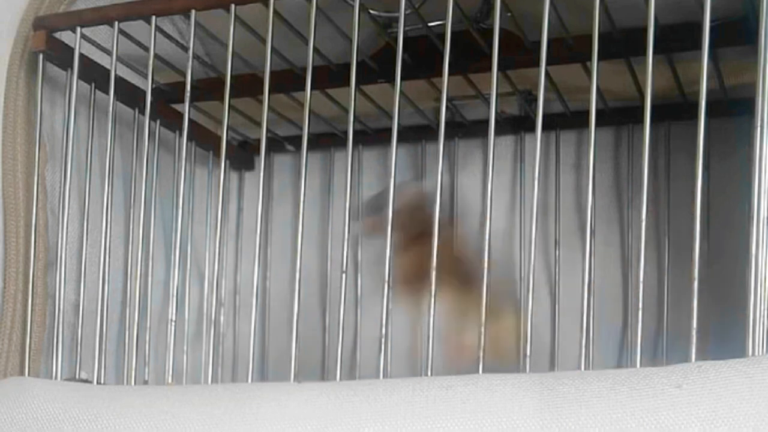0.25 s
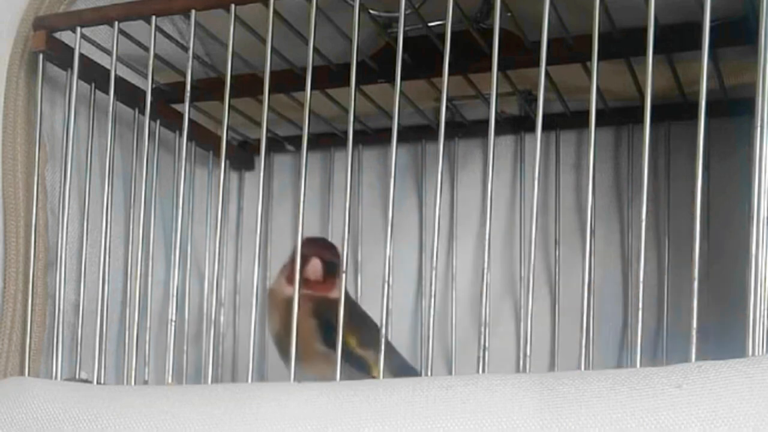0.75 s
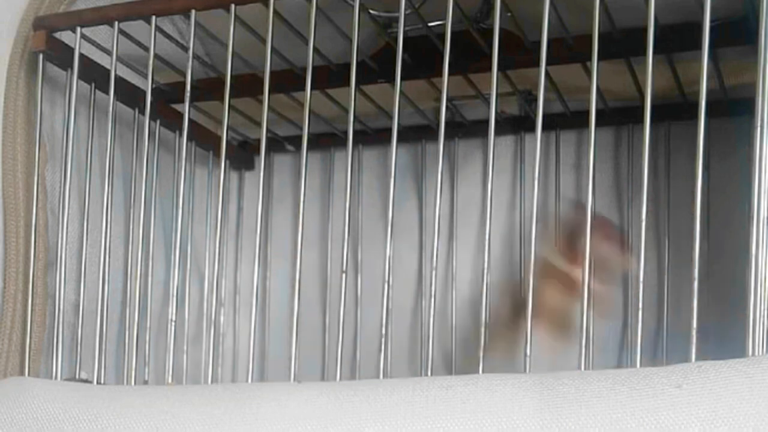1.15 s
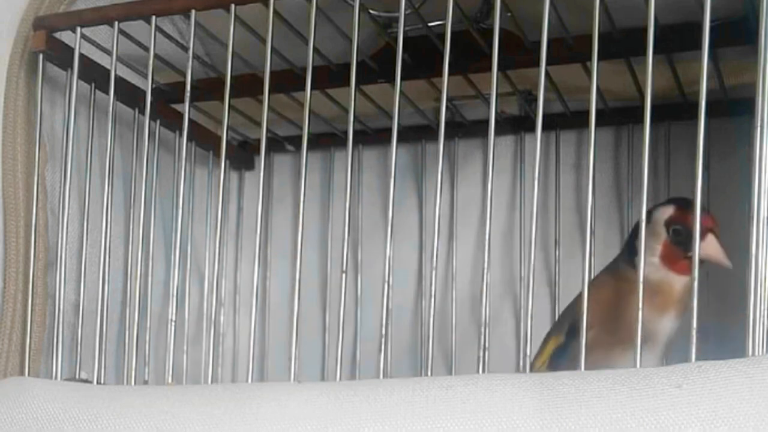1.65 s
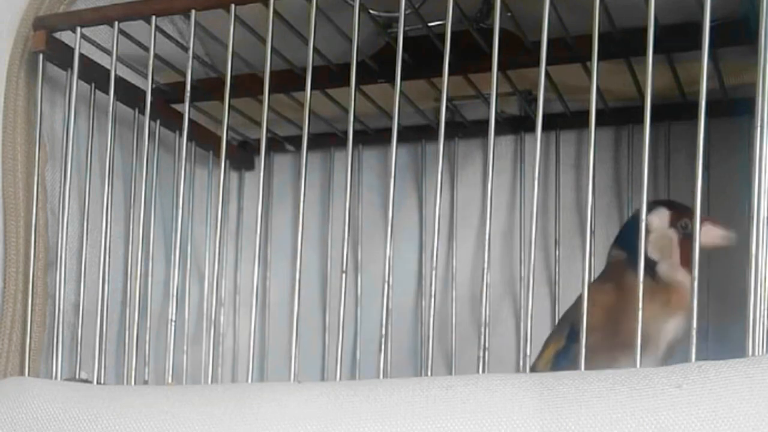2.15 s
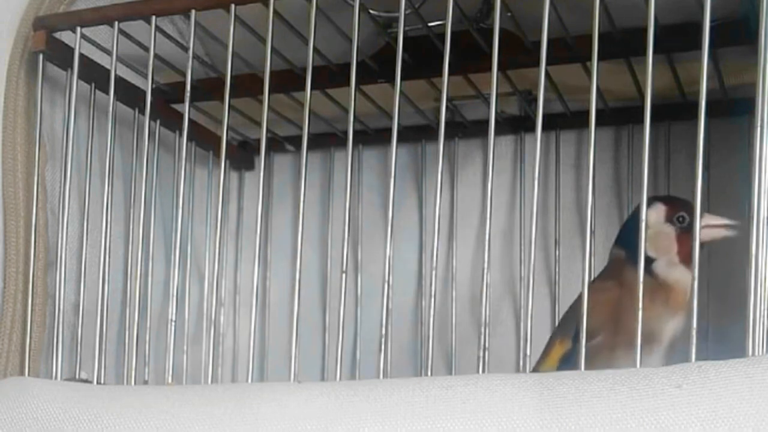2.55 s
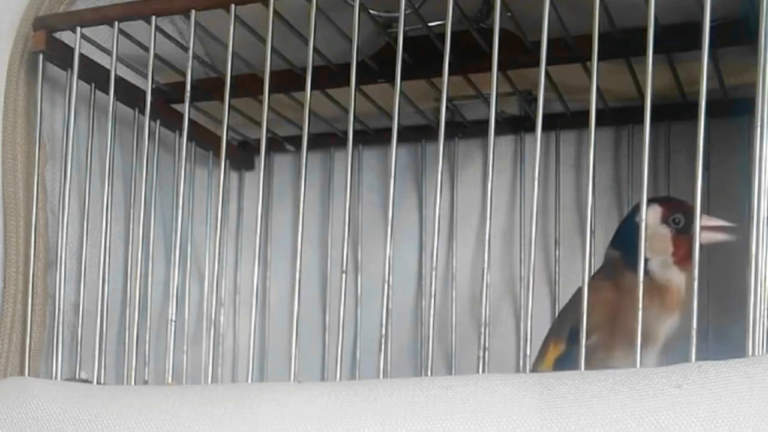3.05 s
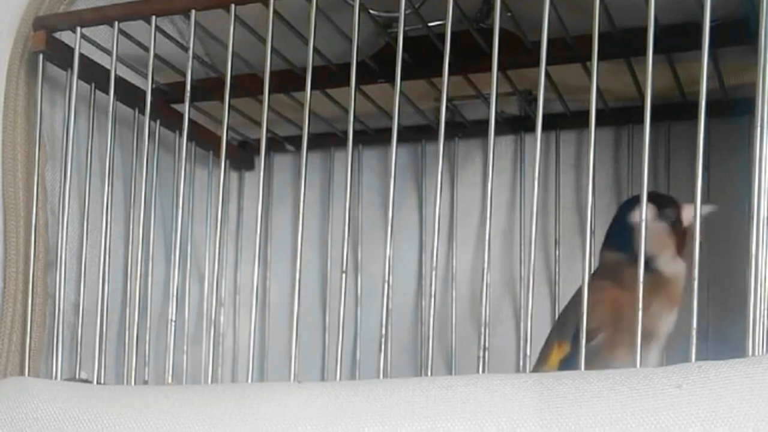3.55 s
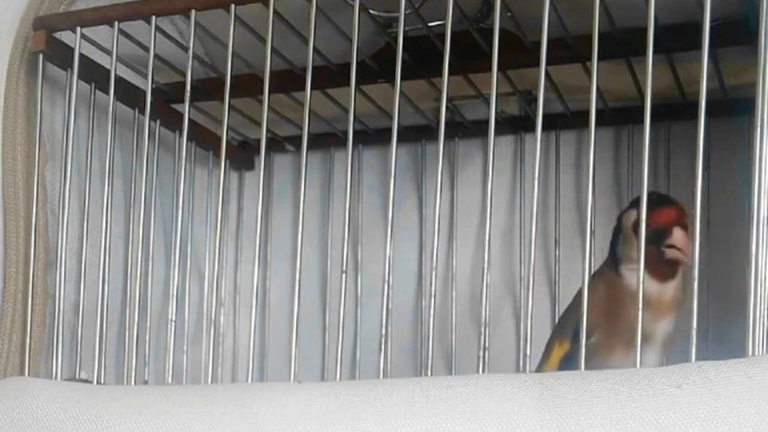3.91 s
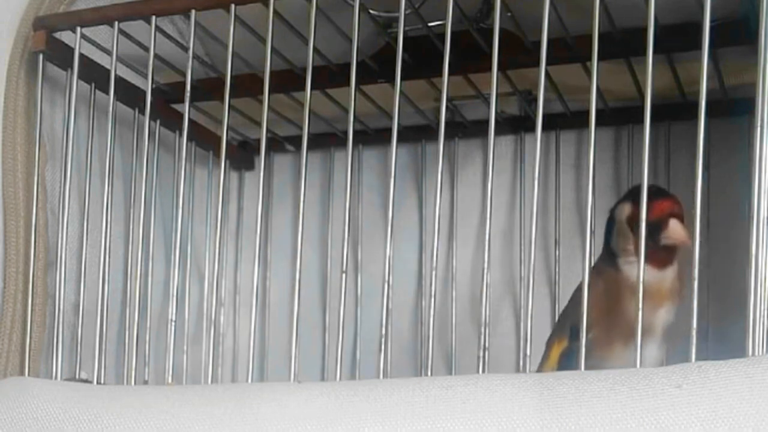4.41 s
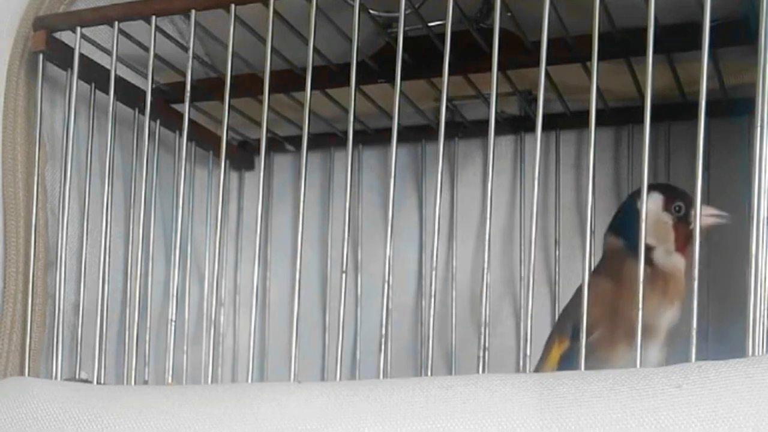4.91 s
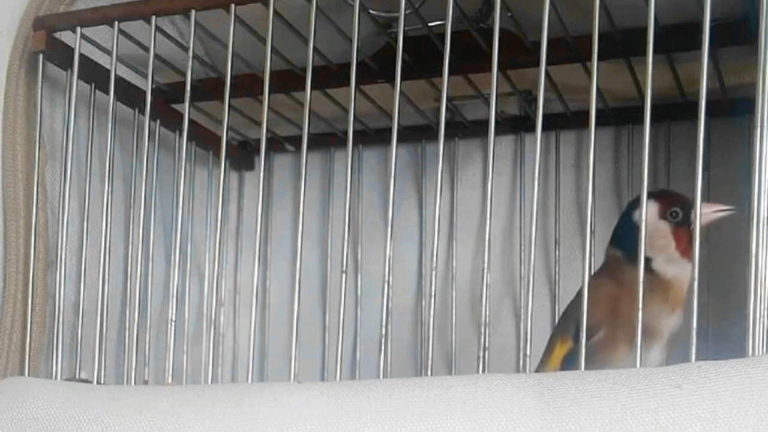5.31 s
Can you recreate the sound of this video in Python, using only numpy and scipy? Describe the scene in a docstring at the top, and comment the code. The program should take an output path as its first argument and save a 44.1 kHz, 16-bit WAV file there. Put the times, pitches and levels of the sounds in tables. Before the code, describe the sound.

Soft perch thumps and wire ticks, then a small finch's rapid piercing trill and repeated whistled phrases ring close over faint room noise.

```python
"""In a small hard room a caged finch hops between perches, gives two soft calls and breaks into a fast song.
Its notes are gliding sines with weak overtones and breath; a faint far bird is made the same way.
Perch knocks are decaying tones with noise; claw ticks and a rustle are shaped noise.
The room adds echoes and a diffuse tail; the loud notes overload the recorder.
Coloured room noise, a faint unsteady hum and hiss lie underneath."""
import sys
import numpy as np
from scipy import signal
from scipy.fft import rfft, irfft, next_fast_len
from scipy.io import wavfile
from scipy.ndimage import map_coordinates

SR = 44100
rng = np.random.default_rng(int(sys.argv[2]) if len(sys.argv) > 2 else 0)


def voltage_ratio(level):
    """Linear amplitude factor for a level in decibels (scalar or array-like)."""
    return 10 ** (np.asarray(level, float) / 20)


def wav_record(signal):
    """Record a signal, one row per channel, as 16-bit PCM in the file named by sys.argv[1]."""
    frames = np.transpose(np.atleast_2d(signal))
    bounded = np.clip(frames, -1, 1)
    # unit amplitude maps onto the largest positive 16-bit level
    quanta = np.round(bounded * 32767).astype(np.int16)
    wavfile.write(sys.argv[1], SR, quanta)


N = 245637


def along(points, hz):
    """Interpolation on a logarithmic frequency axis, through (f/Hz, value) points."""
    f, value = np.transpose(points)
    return np.interp(np.log(hz + 1), np.log(f + 1), value)


def coloured(x, points):
    """Linear filtering: the spectrum is multiplied by a gain through (f/Hz, level/dB) points."""
    size = next_fast_len(N + 8192)
    gain = voltage_ratio(along(points, np.fft.rfftfreq(size, 1 / SR)))
    return irfft(rfft(x, size) * gain, size)[:N]


def wobble(rate):
    """Slow random modulation: a smooth curve through rate Gaussian knots a second."""
    knots = rng.standard_normal(int(N * rate / SR) + 4)
    return map_coordinates(knots, [np.arange(N) * rate / SR])


def add(track, s, sound):
    """Superposition: a sound is summed into the track at time s."""
    part = track[round(s * SR):][:len(sound)]
    part += sound[:len(part)]


# Spectrum of the room noise, relative: f/Hz, level/dB per Hz
AIR_SPECTRUM = [(15, -87.5), (25, -25), (116, -14.5), (148, -4), (174, -4), (437, -8), (637, -9.5),
                (1060, -11), (1250, -15), (3490, -19.5), (3780, -24), (4330, -21.5), (15800, -42.5)]
# Course of the room noise, before a small level correction and drift: t/s, level/dB
AIR_COURSE = [(0.0, -55.5), (1.02, -57.5), (1.71, -52), (2.51, -57.5), (3.41, -56), (5.57, -53.5)]
# Hum lines of an appliance, mean level: f/Hz, level/dB, random level knots a second
HUM_LINES = [(145, -58.5, 3.8), (215, -62, 14), (329, -63.5, 10), (435, -66, 8.2), (3670, -66, 220),
             (4270, -70, 25)]


def background():
    """Stationary noise shaped by filtering, with slow level drift, amplitude-modulated hum and microphone hiss."""
    t = np.arange(N) / SR
    swells = voltage_ratio(0.9 * wobble(5))
    air = coloured(rng.standard_normal(N), AIR_SPECTRUM)
    air /= np.sqrt(np.mean(air ** 2))
    air *= voltage_ratio(np.interp(t, *np.transpose(AIR_COURSE)) + 3.0) * swells
    hum = sum(voltage_ratio(db + 2.1 * wobble(rate)) * np.sin(2 * np.pi * hz * t) for hz, db, rate in HUM_LINES)
    hiss = voltage_ratio(-65.5) * coloured(rng.standard_normal(N), [(100, -39), (1500, 1)])
    return air + hum + hiss


# Feet landing on the wooden perch, level of the tone at onset: t/s, level/dB, f/Hz
PERCH_KNOCKS = [(0.079, -40, 395), (0.328, -37, 533), (0.778, -38, 536)]


def landings():
    """Impact excitation: each thump is a damped perch tone with a dull noise of the same decay."""
    out, t = np.zeros(N), np.arange(SR // 8) / SR
    for s, db, hz in PERCH_KNOCKS:
        dull = signal.lfilter([0.25], [1, -0.85], rng.standard_normal(len(t)))
        decay = voltage_ratio(db - 60 * t / 0.043)  # 60 dB in 43 ms
        add(out, s, decay * (np.sin(2 * np.pi * hz * t) + 0.42 * dull))
    return out


# Claws ticking on the wire, before a level correction: t/s, level/dB
CLAW_TICKS = [(0.3287, -48), (1.139, -37), (1.147, -61), (1.1937, -41.5), (1.1974, -64), (1.2075, -27),
              (1.2238, -38.5)]


def claws():
    """Broadband impact: each tick is a rapidly damped burst of slightly dulled noise."""
    out, t = np.zeros(N), np.arange(SR // 8) / SR
    for s, db in CLAW_TICKS:
        burst = signal.lfilter([1], [1, -0.3], rng.standard_normal(len(t)))
        add(out, s, voltage_ratio(db - 7.5 - 60 * t / 0.017) * burst)  # 60 dB in 17 ms
    return out


# Overtones of the syrinx, before each kind's brightness and chance: multiple of the fundamental, level/dB
SYRINX_OVERTONES = [(2, -32), (3, -41.5)]


def whistles(notes, settle, bend, attack, release, swell, waver_db=1.07, bright_db=-3.5):
    """Frequency modulation: integrated gliding pitch drives a sine, its overtones and a trace of breath.
    Notes: t/s, length/s, start f/Hz, end f/Hz, start level/dB, end level/dB, before edges, waver and colour.
    settle, attack, release are in s; bend 1 starts steep, 2 level; swell under 1 moves early, over 1 late."""
    out = np.zeros(N)
    waver, drift, breath = wobble(60), wobble(40), rng.standard_normal(N)
    flicker = voltage_ratio(4 * np.array([wobble(90) for _ in SYRINX_OVERTONES]))  # uneven by chance
    for s, length, start_hz, end_hz, start_db, end_db in notes:
        t = np.arange(int(length * SR)) / SR
        here = slice(round(s * SR), round(s * SR) + len(t))
        hz = end_hz + (start_hz - end_hz) * np.exp(-(t / settle) ** bend)
        hz = hz * (1 + 0.0032 * drift[here])  # pitch is never quite steady
        phase = 2 * np.pi * np.cumsum(hz) / SR
        tone = np.sin(phase) + voltage_ratio(-50) * breath[here]  # air hissing past the membranes
        for (multiple, db), uneven in zip(SYRINX_OVERTONES, flicker):
            in_range = multiple * hz < SR / 2  # nothing above half the sample rate
            tone += voltage_ratio(db + bright_db) * uneven[here] * np.sin(round(multiple) * phase) * in_range
        nearest_edge = np.minimum(t / attack, (length - t) / release)
        edges = np.sin(np.pi / 2 * np.clip(nearest_edge, 0, 1)) ** 3
        level = voltage_ratio(start_db + (end_db - start_db) * (t / length) ** swell)
        add(out, s, level * edges * tone)
    return out * voltage_ratio(waver_db * waver)  # each note's level wavers by chance


def kind(rows, change_db, start, length=None):
    """Common scaling: one pitch ratio (start over end) and one level change turn rows into whole notes."""
    return [(s, length or own[0], start * hz, hz, db, db + change_db) for s, *own, hz, db in rows]


# Faint notes of a far bird: t/s, length/s, end f/Hz, start level/dB
FAR_NOTES = [(.55, 0.1, 3150, -50.5), (.655, 0.18, 4030, -47.5)]


def far_bird():
    """Slow frequency glide: faint notes sink slightly in pitch and fade."""
    return whistles(kind(FAR_NOTES, -24, 1.02), settle=0.041, bend=0.85, attack=0.04, release=0.032,
                    swell=0.83, waver_db=2)


# Feathers and feet settling, before random level changes: t/s, length/s, level/dB
SETTLING = (1.182, .06, -53)


def rustle():
    """Amplitude-modulated friction noise: white noise under a smooth envelope and a random flutter."""
    out = np.zeros(N)
    s, length, db = SETTLING
    size = int(length * SR)
    flutter = voltage_ratio(db + 5.4 * wobble(230)[:size])
    add(out, s, flutter * np.hanning(size) * rng.standard_normal(size))
    return out


# The two opening calls: t/s, top f/Hz, start level/dB
OPENING_CALLS = [(1.338, 3567, -14), (1.536, 3570, -18)]


def soft_calls():
    """Upward frequency glide: soft calls rise from 0.78 of their top pitch while fading."""
    return whistles(kind(OPENING_CALLS, -18, 0.78, length=0.038), settle=0.013, bend=1.46,
                    attack=0.015, release=0.0085, swell=0.77, bright_db=11.5)


# Thin level note before the trill: t/s, length/s, start f/Hz, end f/Hz, start level/dB, end level/dB
THIN_NOTE = (1.674, .032, 6810, 6770, -25, -28)
# Steep downstrokes with a level ending: t/s, stroke start level/dB, ending level/dB
TRILL_NOTES = [(1.718, -8, -35), (1.815, -5.5, -29.5), (1.922, 1.3, -22), (2.028, 0.1, -26),
               (2.132, 1, -19.5), (2.232, 0, -16), (2.334, 1, -15.5), (2.436, 0.3, -13), (2.541, -1, -11),
               (2.645, 0.7, -15)]


def trill():
    """Rapid downward glide: after one thin note, steep strokes each end nearly level past a break in the voice."""
    strokes = [(s, 0.03, 6093, 4146, db, db - 5.5) for s, db, _ in TRILL_NOTES]
    endings = [(s + 0.026, 0.024, 4590, 4372, db, db) for s, _, db in TRILL_NOTES]
    return (whistles(strokes, settle=0.02, bend=1.05, attack=0.019, release=0.0092, swell=1.0, bright_db=-4.0)
            + whistles(endings + [THIN_NOTE], settle=0.0047, bend=1.14, attack=0.007, release=0.0054,
                       swell=0.9))


# Short upstrokes: t/s, start f/Hz, top f/Hz, start level/dB
CHIP_NOTES = [(1.784, 3016, 3444, -10), (1.895, 2795, 3360, -8), (2, 2770, 3363, -7.5),
              (2.103, 2797, 3410, -9), (2.205, 2797, 3467, -11.5), (2.304, 2850, 3470, -9.5),
              (2.406, 2840, 3544, -9.5), (2.513, 2684, 3350, -9.5), (2.617, 2757, 3362, -8.5),
              (2.802, 2930, 3640, -7.5), (2.98, 2934, 3618, -9), (3.154, 2958, 3650, -7),
              (3.324, 2893, 3600, -8), (3.485, 2930, 3610, -10), (4.683, 2570, 3040, -7),
              (5.083, 2940, 3873, -7)]
# Weak lead-ins with a small rise: t/s, length/s, top f/Hz, start level/dB
LEAD_INS = [(3.583, 0.024, 3096, -11), (3.796, 0.027, 2796, -14.5), (4.011, 0.032, 2747, -16),
            (4.236, .031, 2710, -17.5), (4.461, 0.031, 2617, -18), (4.83, 0.023, 5870, -14),
            (5.143, 0.042, 5680, -22.5)]


def upstrokes():
    """Upward frequency glide: chips and weaker lead-ins sweep up to a top pitch."""
    chips = [(s, 0.027, start_hz, top_hz, db, db - 5) for s, start_hz, top_hz, db in CHIP_NOTES]
    return whistles(chips + kind(LEAD_INS, -5.5, 0.89), settle=0.013, bend=2.01, attack=0.016,
                    release=0.0082, swell=0.9, bright_db=2.5)


# High falls: t/s, length/s, start f/Hz, end f/Hz, end level/dB
HIGH_FALLS = [(2.728, 0.05, 7110, 5882, 1.5), (2.902, 0.049, 7240, 5840, 3),
              (3.076, 0.044, 6970, 5894, 5.5), (3.253, 0.044, 9050, 5840, -1),
              (3.421, .044, 8500, 5750, -1.5), (5.494, 0.049, 7030, 6030, -5)]


def swoops():
    """Downward glide with a crescendo: high falls swell late from one soft start level."""
    notes = [(s, length, start_hz, end_hz, -16.5, db) for s, length, start_hz, end_hz, db in HIGH_FALLS]
    return whistles(notes, settle=0.0105, bend=0.95, attack=0.0049, release=0.0084, swell=1.74)


# A loud leap, then a softer held pitch: t/s, hold length/s, held f/Hz, leap level/dB, hold start level/dB
LEAP_HOLDS = [(2.835, 0.055, 4670, -6.5, -12), (3.014, 0.056, 4635, -7.5, -11),
              (3.187, 0.039, 4701, -3, -12), (3.355, 0.038, 4670, -3, -11.5),
              (3.517, 0.062, 4717, -1, -14.5)]


def jumps():
    """Glide and sustain: a quick upward leap overshoots the held pitch that overlaps its end."""
    leaps = [(s, 0.018, 0.84 * hz, 1.02 * hz, db, db) for s, _, hz, db, _ in LEAP_HOLDS]
    holds = [(s + 0.013, length, 1.01 * hz, hz, db, db - 4) for s, length, hz, _, db in LEAP_HOLDS]
    return (whistles(leaps, settle=0.009, bend=2.1, attack=0.01, release=0.011, swell=1)
            + whistles(holds, settle=0.016, bend=1.2, attack=0.0072, release=0.0056, swell=0.55,
                       waver_db=5, bright_db=-0.7))


# Upstrokes that hold their end pitch: t/s, length/s, held f/Hz, start level/dB, level change/dB
HELD_RISES = [(3.614, .075, 3870, -4.5, -14), (3.821, 0.043, 3547, -1.5, -10.5),
              (4.039, .043, 3587, -1, -15), (4.264, 0.041, 3510, -1.5, -8.5), (4.488, 0.037, 3500, -1, -12),
              (4.749, 0.057, 3830, -4, -12), (4.975, 0.12, 2988, -3.5, -20), (5.296, .134, 2964, -1.1, -17),
              (5.423, 0.04, 3875, -3.5, -11)]


def rises():
    """S-shaped glide of frequency: upstrokes approach and hold a pitch as they fade."""
    notes = [(s, length, 0.835 * hz, hz, db, db + fade_db) for s, length, hz, db, fade_db in HELD_RISES]
    return whistles(notes, settle=0.0136, bend=1.99, attack=0.017, release=0.0067, swell=0.38,
                    waver_db=2.08, bright_db=-0.5)


# Loud blips before a drop or slide: t/s, start f/Hz, aimed f/Hz, start level/dB
BLIPS = [(3.68, 5407, 3970, -10), (3.884, 5400, 3950, -11), (4.1, 5263, 4340, -9.5),
         (4.328, 5293, 4070, -10), (4.55, 5170, 4300, -11), (4.848, 5170, 2920, -11.5),
         (5.171, 5140, 2920, -11.5)]


def pips():
    """Truncated glide: falling blips swell and are cut off before they reach the aimed pitch."""
    notes = [(s, 0.021, start_hz, aim_hz, db, db + 7.5) for s, start_hz, aim_hz, db in BLIPS]
    return whistles(notes, settle=0.0352, bend=2.18, attack=0.0042, release=0.008, swell=0.81)


# Small falls to a held pitch: t/s, length/s, held f/Hz, start level/dB
SMALL_FALLS = [(3.696, 0.096, 4577, -6), (3.899, 0.093, 4607, 0), (4.116, 0.088, 4543, -2),
               (4.344, 0.09, 4573, -3.5), (4.566, 0.11, 4600, -1.5)]


def drops():
    """Exponential settling of frequency: small falls hold their end pitch and fade early."""
    return whistles(kind(SMALL_FALLS, -12.5, 1.12), settle=0.0094, bend=1.0, attack=0.01, release=0.013,
                    swell=0.44, waver_db=5.0, bright_db=-7.0)


# Long falls: t/s, length/s, held f/Hz, start level/dB
LONG_FALLS = [(4.867, 0.0635, 4265, -9.5), (5.193, 0.059, 4263, -10)]


def slides():
    """Downward glide with a late crescendo: long falls swell near their end."""
    return whistles(kind(LONG_FALLS, 5, 1.12), settle=0.01783, bend=1.123, attack=0.0022, release=0.0082,
                    swell=5.2)


# Thin notes, probably the other side of the syrinx: t/s, length/s, end f/Hz, start level/dB
THIN_NOTES = [(5.01, 0.069, 3280, -37.5), (5.325, 0.063, 3177, -22), (5.52, .045, 6290, -17)]


def second_voice():
    """Superposed second source: thin notes fall slightly and swell beside the main voice."""
    return whistles(kind(THIN_NOTES, 2.5, 1.045), settle=0.01, bend=4.3, attack=0.031, release=0.0043,
                    swell=0.71, waver_db=-3)


# Colour of beak, cage and microphone: f/Hz, level/dB
BEAK_COLOUR = [(2300, -8), (2800, 4), (3300, 3.4), (3800, 5), (4300, 5), (4750, 0), (5200, 1.5), (5900, 3),
               (6300, 2.5), (7000, 1.5), (8000, 6), (9300, 2), (10500, 4.5), (14000, 12)]


def song():
    """Source-filter principle: the sum of all whistled notes passes through one fixed colour."""
    voice = upstrokes() + rises() + jumps() + trill() + pips() + drops() + swoops() + slides()
    voice = voice + second_voice() + far_bird() + soft_calls()
    return coloured(voice, BEAK_COLOUR)


# Reverberation time: f/Hz, T60/s
DECAY_TIMES = [(1000, 0.67), (3000, 0.31), (4500, 0.5), (6000, 0.35), (12000, 0.5)]
# Reflections from near walls, relative to the direct sound: t/s, level/dB
WALL_ECHOES = [(.009, -16.5), (.015, -14), (.022, -19.5), (.031, -24)]


def room(x, tail_db):
    """Reverberation: discrete near reflections and a diffuse tail with frequency-dependent decay."""
    hz, t, noise = signal.stft(rng.standard_normal((2, SR * 3 // 4)), SR, nperseg=256)
    decay = voltage_ratio(-60 * t / along(DECAY_TIMES, hz)[:, None])
    tails = signal.istft(noise * decay, SR, nperseg=256)[1]
    tails *= 1 - np.exp(-np.arange(tails.shape[1]) / SR / 0.012)  # the tail builds up
    # The head never keeps still, so the paths into the room keep changing: angle in radians
    turn = 1.2 * wobble(14)
    sent = x * np.array([np.cos(turn), np.sin(turn)])
    diffuse = signal.fftconvolve(sent, tails / np.linalg.norm(tails[0]), axes=1).sum(axis=0)[:N]
    out = x + voltage_ratio(tail_db) * diffuse
    for s, db in WALL_ECHOES:
        add(out, s, voltage_ratio(db) * x)
    return out


def scene():
    """Superposition: bird and cage sound in the room, over the background."""
    sources = song() + landings() + claws() + rustle()
    return (room(sources, tail_db=-9) + background())[None]


def squash(size, top, hardness):
    """Saturation: a gain that keeps size under top, with a sharper knee for greater hardness."""
    return (1 + (size / top) ** hardness) ** (-1 / hardness)


def band_limit(x):
    """A steep low-pass at the top of the band."""
    return signal.sosfilt(signal.butter(12, 16230, fs=SR, output="sos"), x)


def record(dry):
    """Nonlinear distortion: a fast limiter holds loud notes; peaks still clip, a little lower on one side."""
    envelope = np.abs(signal.hilbert(dry, next_fast_len(N))[:, :N])
    limited = dry * squash(envelope, 0.76, 4.6)
    ceiling = np.where(limited > 0, 0.505, 0.494)
    clipped = limited * squash(np.abs(limited), ceiling, 15.7)
    return band_limit(clipped)


dry = scene()
out = record(dry)
wav_record(out)
```